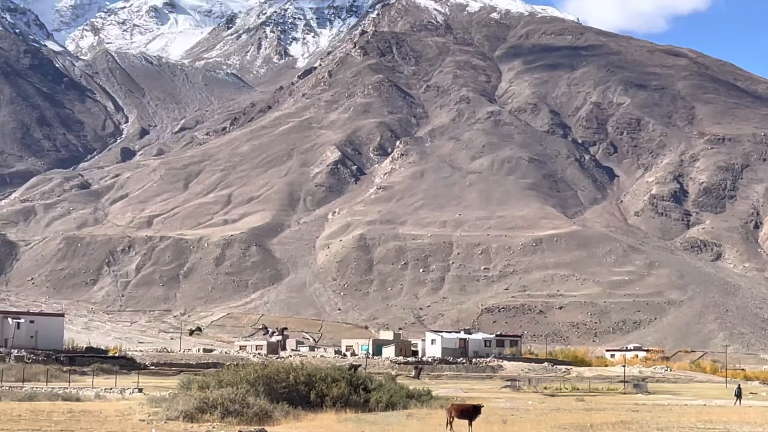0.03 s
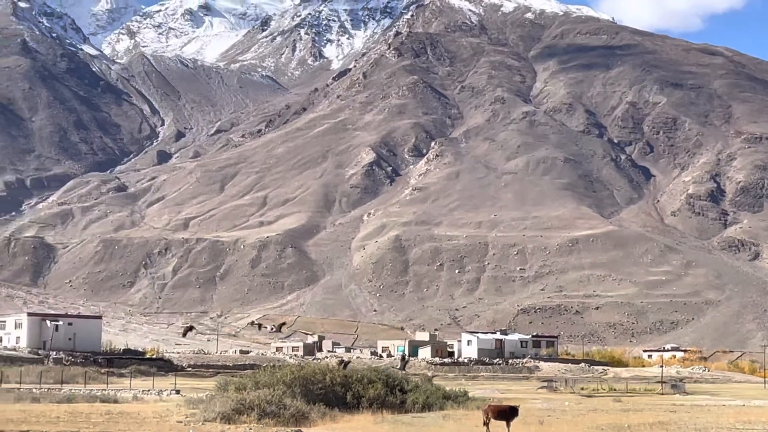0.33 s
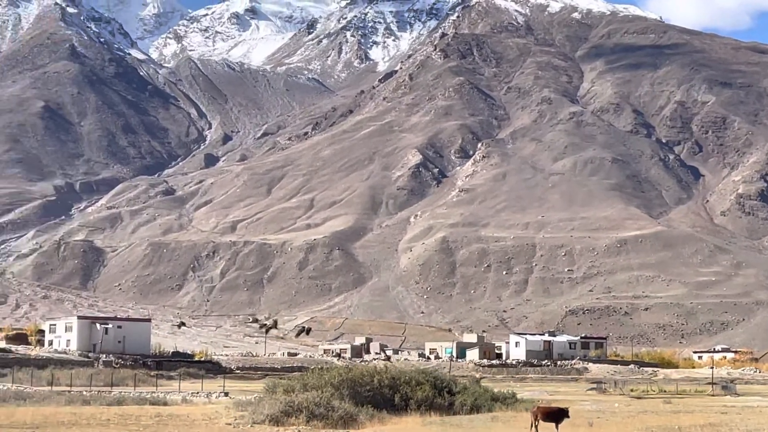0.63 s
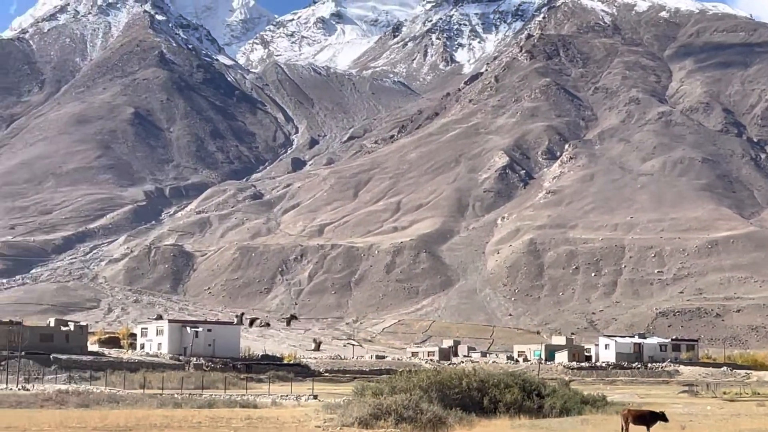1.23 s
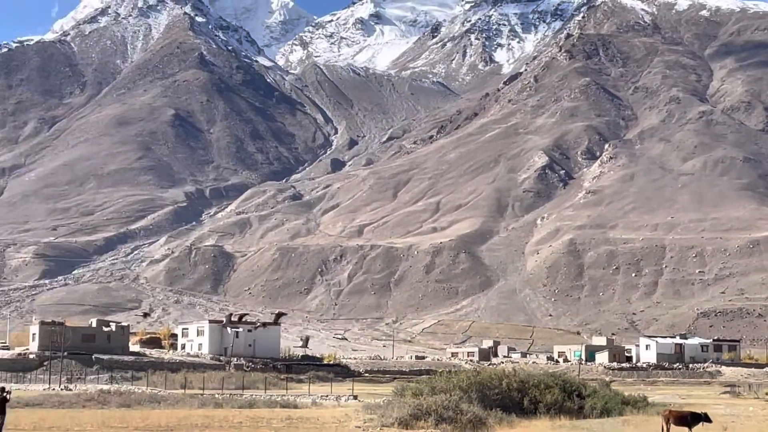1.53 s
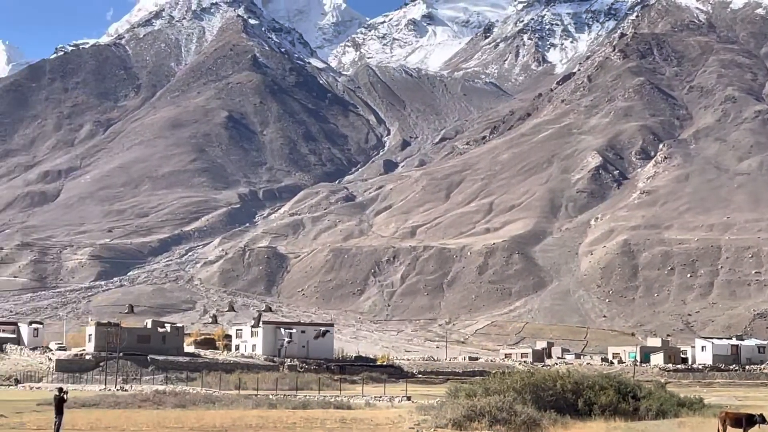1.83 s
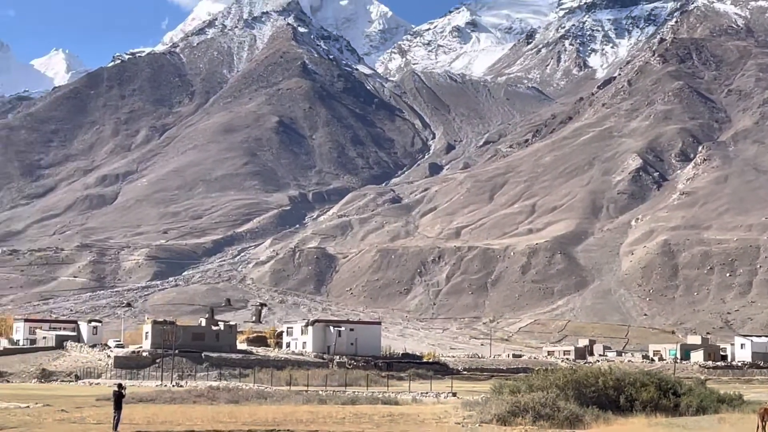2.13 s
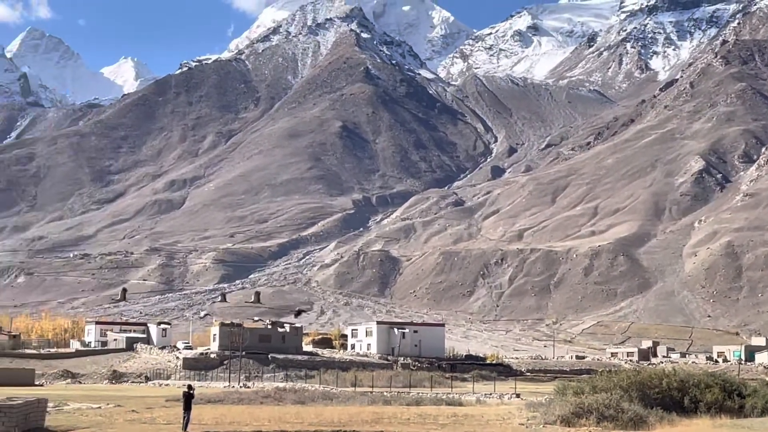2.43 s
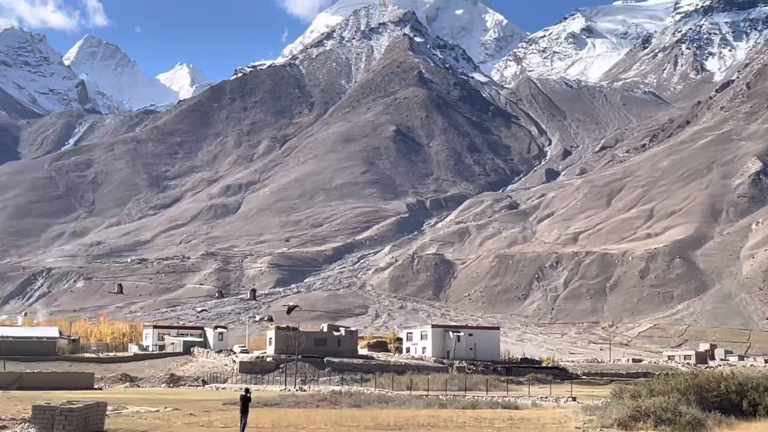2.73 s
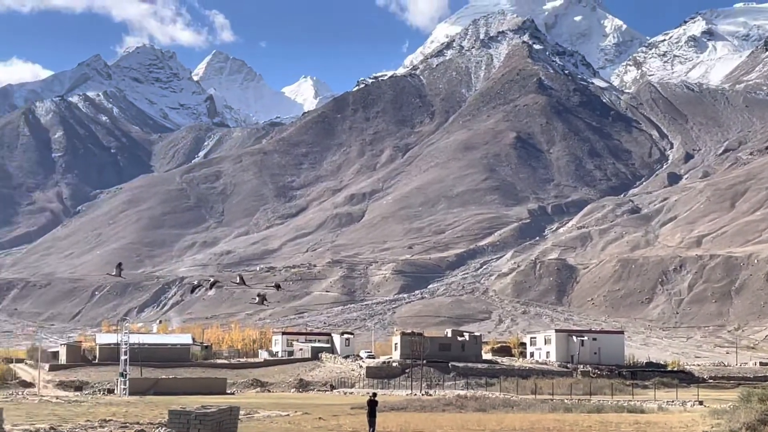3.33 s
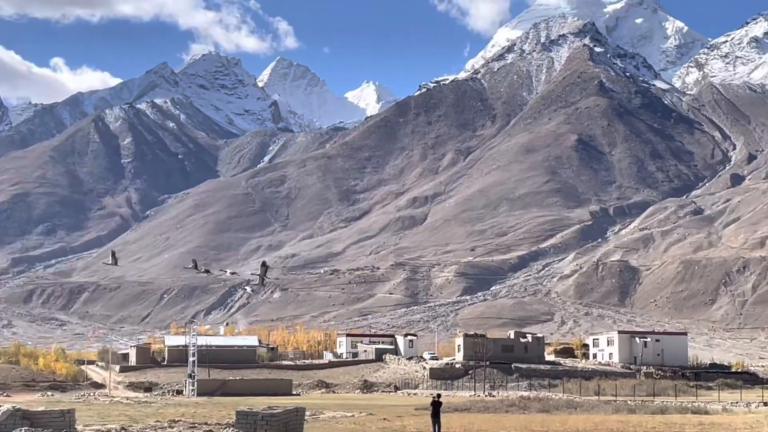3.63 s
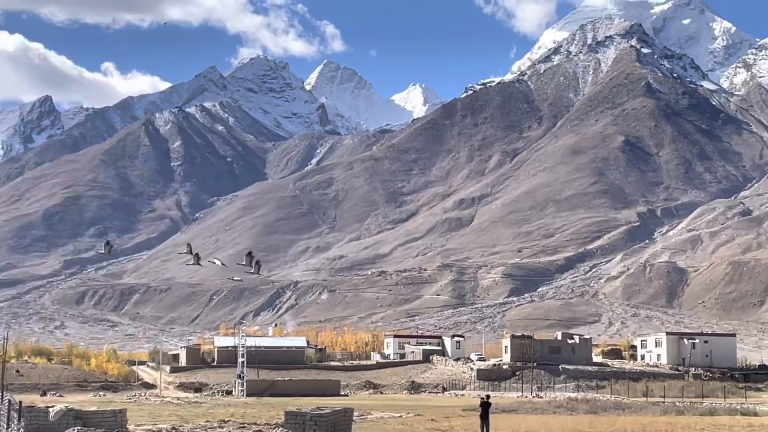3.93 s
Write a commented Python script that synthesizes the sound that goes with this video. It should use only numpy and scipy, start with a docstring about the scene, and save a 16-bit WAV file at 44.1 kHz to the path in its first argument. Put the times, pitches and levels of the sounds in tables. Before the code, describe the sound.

Large birds croak harshly as they fly over an open valley, slightly to the left. Short rasping calls come right at the start, around 0.9 and 1.4 seconds, then at 2.5 and 3 seconds, each with a thin, faint echo. Wind rumbles on the microphone throughout, thumping at the start and from 2 to 2.5 seconds, and swishing softly near 0.3 and 3 seconds.

```python
"""Birds croaking over a mountain valley

Large birds croak as they fly across an open valley. Each croak is a short run of rasping
pulses that ring in the throat; a thin echo and a faint tail follow. Wind rumbles and thumps
on the microphone and swishes past with a faint rustle, and something ticks far away."""
import sys
import numpy as np
from scipy import signal
from scipy.fft import rfft, irfft
from scipy.io import wavfile

SR = 44100
rng = np.random.default_rng(int(sys.argv[2]) if len(sys.argv) > 2 else 0)


def file_out(sig):
    """Save sig as 16-bit WAV at sys.argv[1]."""
    # one column per channel
    cols = np.atleast_2d(sig).T
    # limit, then scale
    lim = np.clip(cols, -1, 1)
    pcm = np.round(lim * 32767).astype(np.int16)
    wavfile.write(sys.argv[1], SR, pcm)


N = 176400
TIME = np.arange(N) / SR
SIDE_SIGN = np.array([[1], [-1]])   # a "side" signal is added on the left and taken away on the right

# Tone of each background sound: f/Hz, relative level/dB
AIR_TONE = [(100, -30), (300, 1.5), (1100, 2.5), (1700, -9), (2400, -4), (3500, -18.5), (5000, -19),
            (7200, -23), (8200, -38), (9700, -26.5), (12000, -30)]
TICK_TONE = [(800, -7), (2300, 4.5), (3700, -6.5), (4600, -20.5), (8000, -58)]
RUSTLE_TONE = [(500, -15.5), (1000, 0), (1400, 7.5), (1750, -1), (2600, -1.5), (3200, -11.5), (4200, -19.5),
               (8000, -34)]
SWISH_TONE = [(100, -17), (330, 4), (850, 5), (1300, -3.5), (1800, -13.5), (4000, -38), (8000, -55)]
RUMBLE_TONE = [(20, -34), (35, -5), (55, 11), (85, 7.5), (120, -3.5), (180, -15), (300, -20), (600, -73.5)]
# How each background sound swells and fades: t/s, relative level/dB
AIR_LEVEL = [(0, -76.5), (3, -77.5), (4, -76)]
TICK_LEVEL = [(0, -60.5), (.4, -74.5), (.8, -72), (1.9, -76.5), (2.5, -82.5), (4, -80.5)]
RUSTLE_LEVEL = [(0, -76), (1.7, -77), (1.95, -77), (2.3, -82.5), (3.45, -85), (3.72, -74), (3.82, -82),
                (3.96, -71), (4, -79)]
SWISH_LEVEL = [(0, -60.5), (.15, -58), (.28, -65.5), (.33, -53.5), (.41, -60), (.55, -73.5), (1.95, -74),
               (2.07, -67), (2.25, -76.5), (2.45, -77), (2.65, -68.5), (2.74, -60.5), (2.88, -64.5),
               (2.99, -51.5), (3.08, -57), (3.27, -62.5), (3.4, -70), (3.52, -67.5), (3.62, -79),
               (4, -75.5)]
RUMBLE_LEVEL = [(0.0, -56), (0.14, -49), (0.18, -60.5), (0.27, -46.5), (0.53, -68.5), (0.61, -56),
                (0.91, -61), (1.9, -57.5), (2.18, -48), (2.29, -65), (2.43, -69.5), (2.48, -48),
                (2.65, -59), (2.84, -55.5), (2.99, -45), (3.11, -62.5), (3.5, -57), (3.58, -56.5),
                (3.82, -58), (3.89, -54.5), (4.0, -63)]
# Stereo width of the background: f/Hz, relative side level/dB
WIDTH = [(100, -45.5), (200, -22), (320, -3), (1500, -4.5), (2600, -20.5), (4500, -33.5), (7000, 2)]
# Wind thumps on the microphone: peak t/s, rise/s, fall/s, level/dB, top f/Hz
THUMPS = [(0.079, 0.02, 0.0057, -44, 224), (.123, 0.015, 0.011, -36.5, 177),
          (0.205, 0.0077, 0.0062, -48.5, 390), (0.261, 0.004, 0.016, -38, 239),
          (1.626, 0.011, 0.027, -48, 175), (1.848, 0.042, 0.0091, -51.5, 187),
          (2.049, 0.013, 0.03, -43.5, 163), (2.134, 0.0083, 0.04, -43, 185),
          (2.179, 0.017, 0.0064, -39, 269), (2.204, 0.0072, 0.0072, -40.5, 280),
          (2.481, 0.0049, 0.0067, -36.5, 301.8), (2.915, 0.041, 0.018, -50.5, 203),
          (2.993, 0.047, 0.014, -50.5, 206.7), (3.58, 0.029, 0.045, -60.5, 172),
          (3.705, 0.028, 0.04, -58.5, 305), (3.885, 0.014, 0.016, -48, 193)]

# Stereo spread of the croaks, widest in the treble: f/Hz, side level/dB
SPREAD_TONE = [(500, -18.5), (1000, -9.5), (2000, -23.5), (4000, -21.5), (8000, 3)]
# Tone of the echo: f/Hz, relative level/dB
ECHO_TONE = [(300, -2), (700, 6), (1050, -12.5), (1500, -8.5), (2000, 1.5), (2500, 4.5), (3200, -16.5),
             (4150, 2.5), (4800, -9), (10000, -13.5)]
# Strength of the echo: t/s, relative level/dB
ECHO_LEVEL = [(.15, -4), (1.08, -16.5), (1.53, -18), (2.65, -10.5), (3.15, -14.5)]
# Side signal that puts the birds a little to the left: f/Hz, level/dB
LEAN_LEFT = [(1000, -20), (2000, -21), (4000, -45)]
# Tone of the puff of hiss that comes with a pulse: f/Hz, relative level/dB
PUFF_TONE = [(600, -3), (1700, 1), (2800, 12), (4000, 3.5), (6500, -5), (7600, -8.5), (8400, -33),
             (9600, -6), (12500, -18.5)]
# Throat resonances, one list for each of five calls and one for a slow rattle: f/Hz, relative level/dB
THROATS = [
    [(1170, -4), (1430, -3), (2400, -15), (2800, -16.5), (5250, -35), (6900, -42)],
    [(1040, 0.5), (1300, -9), (1950, -12), (2280, -6.5), (4350, -29), (5650, -27.5), (7000, -33)],
    [(990, 0), (2060, -4), (2800, -27.5), (4100, -27.5), (6150, -29), (7300, -36)],
    [(1120, -7), (1390, -3), (2000, -15.5), (2430, -11), (2780, -16.5), (4020, -24), (5200, -23),
     (6400, -25.5), (7500, -34.5)],
    [(935, 3.5), (2010, -4), (3650, -27.5), (4650, -25.5), (5800, -28.5), (7150, -41)],
    [(1280, 5.5), (2500, -15.5)],
]
# Runs of pulses: start t/s, length/s, pulse rate/Hz, relative level/dB, swell/(dB per s),
# factor on the resonance pitches, share by which they sag at the end, throat number
CROAKS = [ (0.0235, .036, 141, -30, -57, 1.0, 0.083, 0), (0.0757, .013, 150, -35.5, -800, 0.97, 0.12, 0),
          (0.0975, .013, 190, -51, -2, 1.32, -0.012, 5), (0.791, .055, 115, -59.5, -67, 0.96, 0.011, 5),
          (0.875, .070, 84, -47, 8, 0.843, 0.084, 1), (0.9615, .034, 103, -37.5, 11, 1.064, 0.076, 1),
          (1.02, .008, 120, -48, -4, 0.92, .05, 1), (1.2765, .136, 29.4, -50, -9, 0.96, 0.015, 5),
          (1.361, .008, 146, -50.5, -2, 0.73, 0.084, 5), (1.4007, .044, 116, -30, -84, 1.014, 0.00069, 2),
          (1.4597, .008, 59, -33, -9, 0.94, 0.028, 2), (1.4914, .008, 120, -43, -11, .88, 0.062, 5),
          (2.5036, .013, 196, -42.5, -700, 0.8, 0.11, 3), (2.5301, .037, 136, -34, 16, 1.006, -0.0011, 3),
          (2.5682, .008, 120, -37.5, 0, .84, .05, 3), (2.5786, .008, 105, -43, -2, 1.184, .05, 3),
          (2.5888, .015, 137, -34.5, -600, 0.986, 0.14, 3),
          (3.0289, .021, 138, -35.5, -250, 1.02, 0.087, 4), (3.063, .013, 129, -37, -62, 0.99, 0.049, 4),
          (3.0966, .016, 125, -43, -5, 0.87, 0.032, 4)]

RING_PEAK_S = 0.002102   # the throat's resonances swing in step this long after a snap


def from_db(db):
    """Turn decibels into a gain."""
    return 10 ** (np.asarray(db) / 20)


def rms_one(x):
    """Scale a sound so that its average power is 1."""
    return x / np.sqrt(np.mean(x ** 2) + 1e-20)


def level(points):
    """Join (t/s, level/dB) points into a gain over time."""
    return from_db(np.interp(TIME, *np.transpose(points)))


def colour(x, tone):
    """Filter a sound with a curve through (f/Hz, level/dB) points."""
    hz, db = np.transpose(tone)
    bins_hz = np.maximum(np.fft.rfftfreq(2 * N, 1 / SR), 1)
    gain = from_db(np.interp(np.log(bins_hz), np.log(hz), db))
    return irfft(rfft(x, 2 * N) * gain)[..., :N]


def wide_noise(tone, side_db=-1.5):
    """Stereo noise with the given tone; its bass stays in the centre."""
    mid, side = rms_one(colour(rng.standard_normal((2, N)), tone))
    return mid + from_db(side_db) * colour(side, WIDTH) * SIDE_SIGN


def steadied(noise, share):
    """Take a share of the chance swings out of a noise's level."""
    envelope = np.abs(signal.hilbert(rms_one(noise)))
    return rms_one(noise / (envelope + 0.034) ** share)


def flutter(depth_db, points_per_s=70):
    """A gain that wavers quickly and at random."""
    times = np.arange(0, TIME[-1] + 1, 1 / points_per_s)
    swings = rng.standard_normal(N)[:len(times)]
    return from_db(depth_db * np.interp(TIME, times, swings))


def open_air():
    """The soft, almost steady hush of the open air."""
    return level(AIR_LEVEL) * wide_noise(AIR_TONE)


def far_ticking(ticks_per_s=29.12, rise_s=0.0028, scatter_db=3):
    """Faint, distant ticks: tiny bursts of noise, uneven in timing and strength."""
    unevenness = np.log(flutter(depth_db=1))
    tick_number, phase = np.divmod(TIME * ticks_per_s + 0.74 + unevenness, 1)
    age = phase / ticks_per_s / rise_s
    strength = from_db(scatter_db * rng.standard_normal(N))[tick_number.astype(int)]
    return level(TICK_LEVEL) * strength * age * np.exp(1 - age) * wide_noise(TICK_TONE)


def passing_wind():
    """Wind swishes past with a fainter, brighter rustle; both are fluttering noise."""
    swish = level(SWISH_LEVEL) * flutter(depth_db=1.4) * wide_noise(SWISH_TONE, side_db=-5)
    rustle = level(RUSTLE_LEVEL) * flutter(depth_db=2.5) * wide_noise(RUSTLE_TONE)
    return swish + rustle


def wind_on_microphone(rumble_boost_db=2, thump_low_hz=56, side_db=-10):
    """Wind hits the microphone: a low, centred rumble and brief thumps that reach higher and wider."""
    low_noise = steadied(colour(rng.standard_normal(N), RUMBLE_TONE), share=0.06)
    rumble = from_db(rumble_boost_db) * level(RUMBLE_LEVEL) * low_noise
    thumps = 0
    for peak_s, rise_s, fall_s, db, top_hz in THUMPS:
        band = signal.butter(2, [thump_low_hz, top_hz], "band", fs=SR, output="sos")
        lowpass = signal.butter(4, top_hz, fs=SR, output="sos")
        swirl = steadied(signal.sosfilt(band, rng.standard_normal((2, N))), share=0.44)
        swirl = rms_one(signal.sosfilt(lowpass, swirl))
        age = TIME - peak_s
        envelope = np.exp(-np.where(age < 0, (age / rise_s) ** 2, age / fall_s))
        thumps += from_db(db) * swirl * envelope
    mid, side = thumps
    return rumble + mid + from_db(side_db) * colour(side, WIDTH) * SIDE_SIGN


def scatter(x, envelope, side_db=-3.5):
    """Smear a sound into many tiny stereo reflections that fade along the envelope."""
    reflections = rng.standard_normal((2, N)) * envelope / np.sqrt(np.sum(envelope ** 2))
    mid, side = signal.fftconvolve(reflections, x[None], axes=1)[:, :N]
    return mid + from_db(side_db) * side * SIDE_SIGN


def valley(voice, spread_delay_s=0.001257, echo_s=0.1015, shrink_s_per_s=0.004):
    """Stereo spread, a thin echo that comes sooner as the birds fly on, and tails from the slopes."""
    tail = from_db(-15) * scatter(voice, from_db(-60 * TIME / 0.33))   # falls 60 dB in 0.33 s
    tail = signal.sosfilt(signal.butter(2, 3070, fs=SR, output="sos"), tail)
    delayed = np.interp(TIME * (1 + shrink_s_per_s) - echo_s, TIME, voice)
    echo = level(ECHO_LEVEL) * colour(delayed, ECHO_TONE)
    echo_blur = from_db(-0.5) * scatter(echo, np.exp(-TIME / 0.005))
    echo_tail = from_db(-10) * scatter(echo, from_db(-60 * TIME / 0.37))
    spread = colour(np.interp(TIME - spread_delay_s, TIME, voice), SPREAD_TONE) * SIDE_SIGN
    return spread + tail + echo + echo_blur + echo_tail


def resonate(x, hz, width_hz):
    """Ring at one pitch; filtering three times rounds the ring, and its height is scaled to 1."""
    pole = np.exp((-np.pi * width_hz + 2j * np.pi * hz) / SR)
    ring = signal.lfilter([1], np.poly([pole] * 3), x)
    ring *= np.exp(-2j * np.pi * hz * RING_PEAK_S)
    return ring.imag / np.abs(ring).max()


def throat_pulse(throat, sag, weak_db, rasp=0.88, rasp_s=0.003, wobble=0.011, glide=0.04, glide_s=0.005):
    """One snap of the bird's voice box and a rasp of air ring in the throat, gliding down in pitch."""
    t = TIME[:SR // 40]
    lowest_hz = throat[0][0]
    pulse = 0
    for hz, db in throat:
        octaves_up = np.log2(hz / lowest_hz)
        drive = rasp * rng.standard_normal(len(t)) * np.exp(-t / rasp_s) * np.sqrt(2 / (rasp_s * SR))
        drive[0] = 1   # the snap
        hz *= 1 - sag * 0.75 ** octaves_up + wobble * rng.standard_normal()   # high ones sag less
        gain = from_db(db - 0.14 * weak_db * octaves_up)   # weak pulses are duller
        pulse += gain * resonate(drive, hz, width_hz=205 + 0.027 * hz)
    speed = 1 + glide * (np.exp(-t / glide_s) - np.exp(-2 * RING_PEAK_S / glide_s))
    return np.interp(np.cumsum(speed) / SR, t, pulse)


def birds(jitter_s=0.00015, shimmer_db=0.93, trim_db=-3.5, loud_db=-41, puff_db=-26.5, puff_rise_s=0.0022):
    """Croaks are runs of slightly uneven throat pulses; the strong ones let out a puff of hiss."""
    voice, snaps = np.zeros((2, N + SR))
    for start_s, length_s, rate_hz, db, swell, scale, sag, throat_number in CROAKS:
        throat = [(hz * scale, ring_db) for hz, ring_db in THROATS[int(throat_number)]]
        count = max(1, round(length_s * rate_hz))
        for k in range(count):
            age = k / rate_hz + jitter_s * rng.standard_normal()
            at = int((start_s + age) * SR)
            ending = (k / max(count - 1, 1)) ** 2.4   # the sag comes late in the run
            pulse_db = trim_db + db + swell * age - shimmer_db * rng.standard_normal()
            weak_db = max(loud_db - pulse_db, 0)   # how far short of a loud pulse this one falls
            pulse = throat_pulse(throat, sag * ending, weak_db)
            voice[at:at + len(pulse)] += from_db(pulse_db) * pulse
            snaps[at] = from_db(pulse_db - 0.88 * weak_db)
    puff_shape = (TIME / puff_rise_s * np.exp(1 - TIME / puff_rise_s)) ** 2
    puffs = signal.fftconvolve(snaps, puff_shape)[:N]
    hiss = rms_one(colour(rng.standard_normal(N), PUFF_TONE))
    return voice[:N] + from_db(puff_db) * puffs * hiss


def scene():
    """Birds a little to the left, in the wind and the open air."""
    voice = birds()
    calls = voice + valley(voice)
    calls += colour(calls, LEAN_LEFT) * SIDE_SIGN
    return calls + open_air() + passing_wind() + wind_on_microphone() + far_ticking()


def record(dry):
    """Cut the treble steeply above 13000 Hz."""
    return signal.sosfilt(signal.butter(14, 13000, fs=SR, output="sos"), dry)


dry = scene()
out = record(dry)
file_out(out)
```